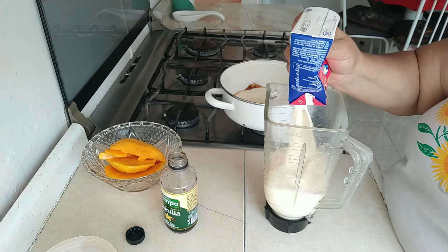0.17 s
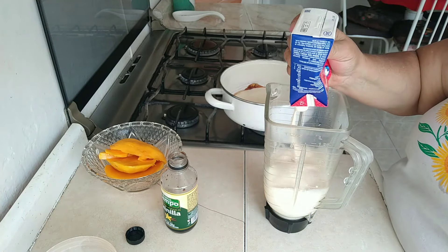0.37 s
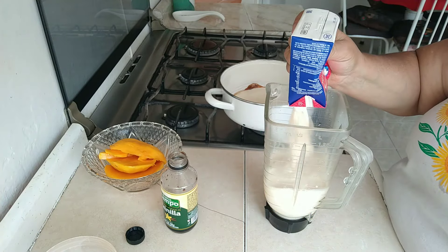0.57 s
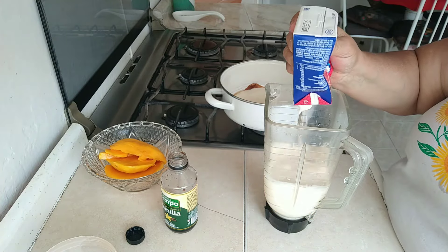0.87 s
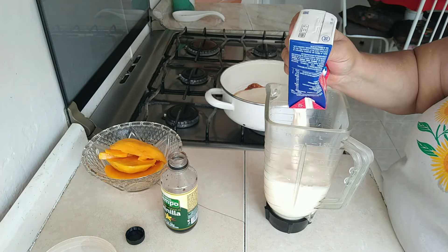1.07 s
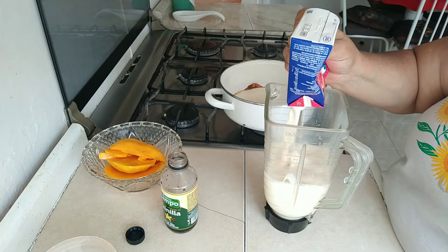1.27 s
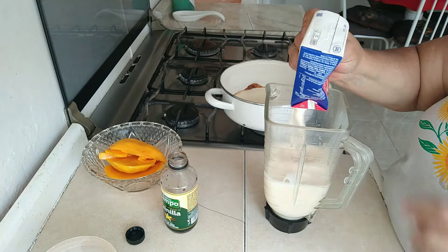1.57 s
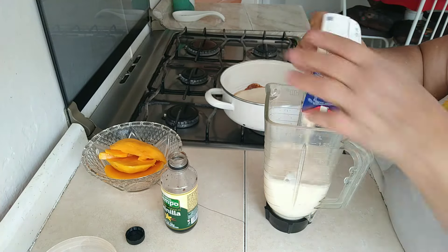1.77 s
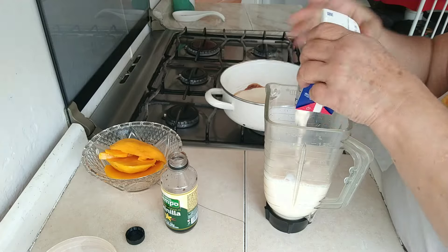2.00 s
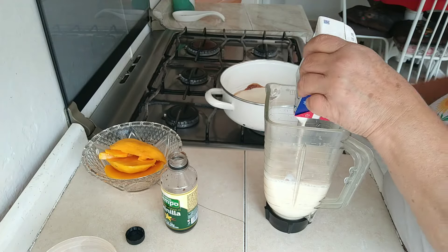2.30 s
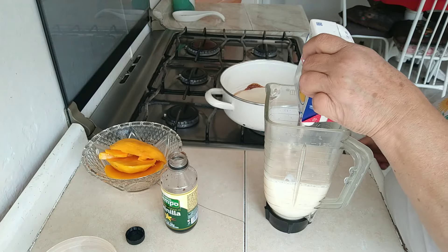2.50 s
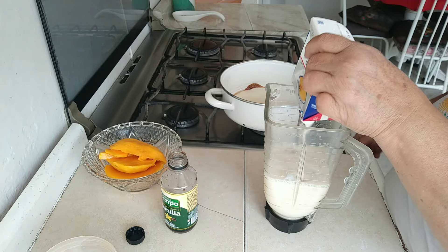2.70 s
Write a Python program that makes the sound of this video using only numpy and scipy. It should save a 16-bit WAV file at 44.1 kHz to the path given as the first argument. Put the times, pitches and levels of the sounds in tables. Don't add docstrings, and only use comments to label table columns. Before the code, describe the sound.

Close up in a small hard-surfaced kitchen, milk glugs in three wet slugs into a ringing jar, then trickles and drips. Faint carton booms and air hisses, a late dull squeeze, and motors droning quietly below.

```python
import sys
import numpy as np
from scipy import signal
from scipy.fft import rfft, irfft
from scipy.io import wavfile
from scipy.ndimage import uniform_filter1d

SR = 44100
rng = np.random.default_rng(int(sys.argv[2]) if len(sys.argv) > 2 else 0)


def nominal_scale(level):
    x = np.asarray(level, float) / 20
    return 10 ** x


def generate_wav(signal):
    frames = np.transpose(np.atleast_2d(signal))
    scaled = np.clip(frames, -1, 1) * 32767
    pcm = np.round(scaled).astype(np.int16)
    wavfile.write(sys.argv[1], SR, pcm)


N = 125685
TIME = np.arange(N) / SR
FREQS = np.fft.rfftfreq(N, 1 / SR) + 1.0

# [t/s, level/dB]
STREAM = [(0.0, -62), (.116, -62), (.123, -57), (.25, -39.5), (.42, -61.5), (.512, -77), (.52, -52),
          (.7, -39.5), (.84, -51), (.93, -71), (1.052, -78), (1.058, -47.5), (1.35, -57.5), (1.428, -83),
          (1.436, -59), (1.74, -72), (1.9, -64.5), (2.13, -82)]
# [t/s, peak level/dB, f/Hz]
GULP_EVENTS = [(0.132, -46, 524), (0.163, -59, 595), (0.208, -42, 553), (0.235, -46.5, 680),
               (0.255, -37.5, 534), (0.272, -41, 532), (0.312, -39.5, 520), (0.345, -47, 633),
               (0.375, -47.5, 546), (0.436, -59, 514), (0.517, -42.5, 630), (0.585, -64, 660),
               (0.603, -40, 790), (0.666, -34.5, 640), (0.683, -38.5, 640), (0.704, -38.5, 452),
               (0.72, -25.5, 631), (0.77, -39, 568), (0.802, -34.5, 492), (0.817, -35, 563),
               (0.835, -36.5, 630), (1.055, -38.5, 498), (1.081, -37, 572), (1.103, -35.5, 577),
               (1.198, -30.5, 577), (1.22, -35.5, 470), (1.25, -37, 462), (1.291, -33, 569),
               (1.33, -36, 527), (1.365, -52, 560), (1.435, -36, 591), (1.452, -33, 603), (1.492, -45, 580),
               (1.52, -44.5, 528), (1.655, -36, 622), (1.675, -47, 566), (1.817, -48.5, 544),
               (1.867, -43.5, 460), (1.889, -39, 553), (1.91, -45.5, 445), (1.95, -46, 624),
               (1.995, -35, 687), (2.035, -50.5, 636), (2.687, -39.5, 686)]
# [t/s, peak level/dB, centre f/Hz, length/s]
SLAP_EVENTS = [(.1203, -35, 2825, 0.03), (.122, -43, 1592, 0.042), (.1577, -37.5, 4310, 0.037),
               (.1871, -25, 1603, 0.014), (.2055, -30, 1540, 0.03), (.2096, -28.5, 2845, 0.016),
               (.245, -28, 2913, 0.018), (.25, -38, 1505, 0.011), (.3024, -25, 2060, 0.011),
               (.303, -46.5, 1600, 0.018), (.4016, -42, 2254, 0.0092), (.5184, -37, 2200, 0.028),
               (.5184, -38, 1213, 0.038), (.5842, -28.5, 4150, 0.011), (.5842, -29.5, 1770, 0.017),
               (.598, -27.5, 2820, 0.0088), (.607, -26.5, 1517, 0.016), (.6581, -25, 1562, 0.017),
               (.68, -31.5, 1600, 0.031), (.68, -24.5, 2630, .008), (.707, -27, 1574, 0.032),
               (.714, -24, 3850, 0.012), (.8142, -37.5, 1983, 0.0087), (1.0562, -35.5, 1590, 0.023),
               (1.058, -44, 3996, 0.033), (1.105, -29.5, 4310, 0.0081), (1.106, -24.5, 3080, 0.0086),
               (1.13, -34, 2440, 0.0044), (1.1664, -37, 2370, 0.0043), (1.1973, -34.5, 2797, 0.03),
               (1.2234, -36, 1985, 0.012), (1.225, -46, 1556, 0.0072), (1.2896, -46.5, 1580, 0.014),
               (1.3385, -42.5, 1700, 0.0076), (1.4343, -37.5, 1780, 0.01), (1.446, -32, 1707, 0.02),
               (1.4892, -37.5, 1727, 0.033), (1.4892, -35.5, 2300, .01), (1.5835, -41.5, 4380, 0.0076),
               (1.6518, -38.5, 3890, 0.0075), (1.665, -48, 1343, 0.019), (1.8189, -45, 2160, 0.0072),
               (1.8673, -41, 1580, 0.01), (1.885, -36.5, 1112, 0.018), (1.9481, -49.5, 1660, 0.011)]
# [t/s, peak level/dB, centre f/Hz, length/s]
SPRAY_EVENTS = [(0.066, -58.5, 7200, 0.0072), (0.118, -38.5, 8460, 0.0095), (0.154, -38, 5400, .01),
                (0.202, -34.5, 5760, 0.016), (0.228, -41, 6750, 0.015), (0.312, -47, 6400, 0.012),
                (0.396, -51, 8250, 0.011), (0.527, -73, 5960, .02), (0.58, -36, 5940, 0.0071),
                (0.5957, -32, 6540, 0.015), (0.681, -35.5, 5470, 0.0066), (0.711, -31, 7140, 0.0091),
                (0.773, -44, 8850, 0.0081), (0.811, -47, 7150, 0.0047), (0.876, -58.5, 10100, .005),
                (1.1028, -30.5, 7500, 0.0068), (1.1978, -31.5, 6800, 0.0044), (1.2894, -40, 6100, 0.0054),
                (1.4315, -52.5, 10600, 0.015), (1.4907, -42, 5960, .014), (1.541, -54.5, 11500, 0.004),
                (1.567, -46, 12400, 0.0061), (1.592, -54, 7700, 0.019), (1.645, -52, 13700, 0.0067),
                (1.764, -63, 11600, 0.0085), (1.814, -53.5, 5760, 0.013), (1.864, -50, 5740, 0.0085),
                (1.879, -50, 5060, 0.017), (1.948, -58, 8300, 0.0044), (1.9949, -41, 7800, 0.0073)]
# [t/s, peak level/dB, f/Hz]
BOOM_EVENTS = [
    (0.128, -60, 139.6),
    (0.634, -50, 108),
    (0.71, -46.5, 241.5),
    (1.061, -46.5, 136),
    (1.194, -45.5, 128),
    (1.289, -48.5, 135),
    (1.437, -44, 123),
    (1.81, -56.5, 220.7),
]
# [t/s, peak level/dB, centre f/Hz]
CREASE_EVENTS = [
    (2.1028, -49.5, 4240),
    (2.5396, -49.5, 1840),
    (2.691, -47.5, 1790),
]
# [peak t/s, half width/s, level/dB]
SQUEEZE_EVENTS = [
    (2.62, 0.059, -53.5),
    (2.73, 0.037, -56),
]
# [start t/s, length/s, from f/Hz, to f/Hz, level/dB]
WHISTLE_EVENTS = [
    (0.031, 0.19, 8000, 5300, -68),
    (0.389, 0.16, 7470, 5200, -64.5),
    (0.42, 0.047, 2000, 2800, -57),
]
# [f/Hz, width/Hz, level/dB]
JAR_MODES = [(1580, 16, 0), (2142, 7.7, 9), (2780, 44, -6), (3127, 20, 3.5)]
# [f/Hz, level per Hz/dB]
CHURN_COLOUR = [(800, 3.5), (1500, 0.5), (4500, -1.5), (8000, -13), (16000, -10.5)]
# [f/Hz, level per Hz/dB]
SPRAY_COLOUR = [(3000, 4.5), (4500, 1), (8500, -8), (11000, -3), (16000, -0.5)]
# [t/s, level/dB]
RUMBLE_LEVEL = [(0.0, -53), (0.22, -50), (.47, -55), (.68, -49.5), (1.0, -57.5), (1.6, -53.5), (1.9, -63.5),
                (2.3, -60.5), (2.85, -61)]
# [f/Hz, width/Hz, level/dB]
DRONES = [(56.2, 13, 0.5), (85.1, 7.4, 3), (124.4, 21.6, -3)]
# [f/Hz, level per Hz/dB]
AIR_COLOUR = [(90, -39), (150, 2.5), (330, -12.5), (1100, -14.5), (1500, -19.5), (8000, -37),
              (13000, -35.5)]
# [f/Hz, level difference/dB]
LEFT_OVER_RIGHT = [(400, 0.5), (640, 1.5), (1400, -11), (6000, -0.5), (12000, 11.5)]
# [f/Hz, likeness 0 to 1]
LEFT_RIGHT_LIKENESS = [(130, 1), (300, 0.79), (1400, 0), (6000, 0.14)]


def rms_one(x):
    return x / np.sqrt(np.mean(x ** 2) + 1e-20)


def in_time(rows):
    s, level = np.transpose(rows)
    return np.interp(TIME, s, level)


def at_hz(points):
    hz, value = np.transpose(points)
    return np.interp(np.log(FREQS), np.log(hz), value)


def colour(x, spectrum):
    return rms_one(irfft(rfft(x) * nominal_scale(at_hz(spectrum)), N))


def drift(rate_hz):
    r = np.exp(-2 * np.pi * rate_hz / SR)
    settle = 20000
    walk = signal.lfilter([1], [1, -2 * r, r * r], rng.standard_normal(N + settle))
    return rms_one(walk[settle:])


def resonate(x, hz, width_hz):
    r = np.exp(-np.pi * width_hz / SR)
    top = np.array([1, 0, -1]) * (1 - r * r) / 2
    bottom = [1, -2 * r * np.cos(2 * np.pi * hz / SR), r * r]
    return signal.lfilter(top, bottom, x + 1e-18)


def burst(t, length_s, fall_s, rise_s=0.00027):
    rise = np.clip(t / rise_s, 0, 1)
    return rise * np.exp(-np.clip(t - length_s, 0, None) / fall_s)


def grains(per_s, spread_db, count):
    sizes = nominal_scale(spread_db * np.minimum(rng.exponential(1, count), 4))
    signs = rng.choice([-1, 1], count)
    return rms_one(sizes * signs * (rng.random(count) < per_s / SR))


def bubbles(rows, fall_s, spread, cycles, rise, swarm_db, hiss_db, swell_s, thump_db):
    out, t = np.zeros(N + SR), np.arange(4000) / SR
    draws = rng.standard_normal((len(rows), 10, 3))
    for (s, db, hz, length_s), draw in zip(rows, draws):
        early_db = 15 * min(s - 1.1, 0)
        thump_hz = hz * 0.58 * np.exp(0.167 * draw[0, 1])
        thump = nominal_scale(thump_db + 4.1 * draw[0, 2] + early_db) * np.sin(2 * np.pi * thump_hz * t)
        large = np.sin(2 * np.pi * hz * (t + rise * t * t))
        tone = (large + thump) * burst(t, length_s * 0.48, fall_s * 0.46, swell_s)

        birth_s = np.abs(draw[:, :1]) * (length_s + fall_s) * 0.74
        age = np.clip(t - birth_s, 0, None)
        pitch = hz * np.exp(spread * draw[:, 1:2])
        swarm = nominal_scale(4.6 * draw[:, 2:]) * np.sin(2 * np.pi * pitch * (age + 1.6 * rise * age * age))
        swarm = swarm * np.exp(-age * pitch / cycles) * np.clip(age * pitch / 1.5, 0, 1)

        hiss = resonate(grains(4000, 5.5, len(t)), hz, hz * spread * 2.63)
        hiss = rms_one(resonate(hiss, hz, hz * 0.96))
        small = nominal_scale(swarm_db) * swarm.sum(0) + nominal_scale(hiss_db) * hiss
        start = int(s * SR)
        out[start:start + len(t)] += nominal_scale(db - 3.5) * (tone + burst(t, length_s, fall_s) * small)
    return out[:N]


def jar(x, ring_db):
    ring = 0
    for k, (hz, width_hz, db) in enumerate(JAR_MODES):
        ring = ring + nominal_scale(db) * resonate(x, hz, width_hz) * (-1) ** k
    return x + nominal_scale(ring_db) * ring


def gulps():
    rows = [(*row, 0.01174) for row in GULP_EVENTS]
    return bubbles(rows, fall_s=0.01229, spread=0.21, cycles=1.6, rise=0.4,
                   swarm_db=-6, hiss_db=-13.0, swell_s=0.00096, thump_db=-8)


def slaps():
    dry_slaps = bubbles(SLAP_EVENTS, fall_s=0.005, spread=0.352, cycles=7.9, rise=1.02,
                        swarm_db=-8.5, hiss_db=-8.5, swell_s=0.0013, thump_db=-12.5)
    return jar(dry_slaps, 0.55)


def churn():
    flow_db = in_time(STREAM)
    clicks = grains(450, 3.9, N)
    dealt = rng.integers(0, 16, N)
    blips = 0
    for k, hz in enumerate(np.geomspace(1100, 6500, 16)):
        blips = blips + resonate(clicks * (dealt == k), hz, hz / 12.0)
    seethe = colour(rms_one(blips) + 0.59 * grains(6000, 0.45, N), CHURN_COLOUR)
    fizz = rms_one(jar(seethe, 2.8))
    clicks = grains(500, 4.6, N)
    gurgle = resonate(clicks, 630, 130) + resonate(clicks, 470, 150) + 0.7 * resonate(clicks, 300, 200)
    fizz_gain = nominal_scale(flow_db + 3.33 * drift(39))
    gurgle_gain = nominal_scale(flow_db - 4.5 + 1.0 * drift(22))
    return fizz_gain * fizz + gurgle_gain * rms_one(gurgle)


def spray():
    size, octaves = 4096, 0.7
    out, t = np.zeros((2, N + SR)), np.arange(size) / SR
    hz_axis = np.fft.rfftfreq(size, 1 / SR) + 1
    hiss = rms_one(np.array([colour(grains(14000, 0.93, N), SPRAY_COLOUR) for _ in range(2)]))
    for s, db, hz, length_s in SPRAY_EVENTS:
        i = int(s * SR)
        bell = np.exp(-(np.log2(hz_axis / hz) / octaves) ** 2)
        tinted = rms_one(irfft(rfft(hiss[:, i:i + size]) * (bell + 0.25), size))
        out[:, i:i + size] += nominal_scale(db - 8.5) * burst(t, length_s, 0.0055) * tinted
    return out[:, :N]


def tint_pour(pour):
    valley = resonate(pour, 1180, 450)
    ring = resonate(pour, 600, 160)
    return pour - 0.65 * valley + 0.35 * ring


def booms():
    out = 0
    for s, db, hz in BOOM_EVENTS:
        t = np.clip(TIME - s, 0, None)
        tone = np.sin(2 * np.pi * hz * t) + 0.35 * np.sin(2 * np.pi * 1.9 * hz * t)
        out = out + nominal_scale(db + 4.0) * burst(t, 0.0044, 0.034, 0.0022) * tone
    return out


def whistles():
    out, wobble = np.zeros(N), drift(300) + 1j * drift(316)
    for s, length_s, from_hz, to_hz, db in WHISTLE_EVENTS:
        u = np.clip((TIME - s) / length_s, 0, 1)
        hz = from_hz + (to_hz - from_hz) * u ** 1.5
        breath = np.real(wobble * np.exp(2j * np.pi * np.cumsum(hz) / SR))
        out += nominal_scale(db) * np.sin(np.pi * u) ** 0.24 * breath
    return out


def creases():
    clicks, out = grains(3000, 1.5, N), 0
    for s, db, hz in CREASE_EVENTS:
        crackle = rms_one(resonate(clicks, hz, hz * 0.25))
        out = out + nominal_scale(db - 16.5) * burst(TIME - s, 0.0085, 0.012) * crackle
    return out


def squeezes():
    envelope = sum(nominal_scale(db) * np.exp(-((TIME - s) / width_s) ** 2) for s, width_s, db in SQUEEZE_EVENTS)
    rustle = resonate(grains(600, 1.7, N), 210, 180)
    return envelope * rms_one(resonate(rustle, 170, 680))


def ports(x):
    lead = 1.4 * np.exp(-((FREQS - 700) / 110) ** 2)
    tilt = at_hz(LEFT_OVER_RIGHT) / 2
    lags_s = rng.uniform(0.0002, 0.003, (2, 5, 1))
    echoes = np.exp(-2j * np.pi * FREQS * lags_s).sum(1)
    paths = 1 + nominal_scale(-2) * echoes / (1 - 1j * 1500 / FREQS) ** 2
    paths = paths / np.abs(paths) ** 0.6 * nominal_scale(-2)
    sides = np.array([nominal_scale(tilt), nominal_scale(-tilt) * np.exp(-1j * lead)])
    return irfft(rfft(x) * paths * sides, N)


def room(x):
    t60_s, wall_cut_hz = 0.2, 16500
    t, noise = np.arange(SR // 2) / SR, rng.standard_normal((2, SR // 2))
    dull = signal.lfilter([1], [1, -np.exp(-2 * np.pi * wall_cut_hz / SR)], noise)
    late = dull * nominal_scale(-60 * t / t60_s)
    early = 1.03 * noise * nominal_scale(-60 * t / 0.026)
    tail = rfft((late + early) * np.clip(t / 0.0031, 0, 1))
    fine, broad = (uniform_filter1d(np.abs(tail) ** 2, size=k) for k in (25, 500))
    tail = irfft(tail * np.sqrt(broad / fine))
    tail = tail / np.sqrt(np.mean(tail ** 2) * len(t))
    return signal.fftconvolve(x[None], tail, axes=1)[:, :N]


def diffuse():
    mid, side = rfft(rng.standard_normal((2, N)))
    alike = np.clip(at_hz(LEFT_RIGHT_LIKENESS), 0, 1)
    return irfft(np.sqrt(1 + alike) * mid + np.sqrt(1 - alike) * side * [[1], [-1]], N)


def rumble():
    noise, low = diffuse(), 0
    for hz, width_hz, db in DRONES:
        rough = rms_one(resonate(resonate(noise, hz, width_hz), hz, width_hz * 2.2))
        low = low + nominal_scale(db) * (rough + 1.23 * np.sin(2 * np.pi * hz * TIME))
    whine = nominal_scale(-81) * rms_one(resonate(noise, 2800, 200))
    room_tone = nominal_scale(-66) * colour(diffuse(), AIR_COLOUR)
    return nominal_scale(in_time(RUMBLE_LEVEL)) * rms_one(low) + whine + room_tone


def scene():
    near, own = spray()
    pour = tint_pour(gulps() + nominal_scale(-4.5) * slaps() + churn() + near)
    pour = pour + creases() + squeezes()
    air = whistles()
    direct = ports(pour + booms()) + own * [[1.3], [-0.7]] + air * nominal_scale([[-4], [2]])
    reflected = nominal_scale(-5.5) * room(pour + air)
    return direct + reflected + rumble() * nominal_scale([[-0.6], [0.6]])


def top_cut(x):
    return signal.sosfilt(signal.butter(12, 16710, fs=SR, output="sos"), x)


def record(dry):
    no_top = signal.sosfilt(signal.cheby2(12, 50, 16420, fs=SR, output="sos"), dry)
    mix = signal.sosfilt(signal.butter(4, 38, "high", fs=SR, output="sos"), no_top)
    return top_cut(mix)


dry = scene()
out = record(dry)
generate_wav(out)
```